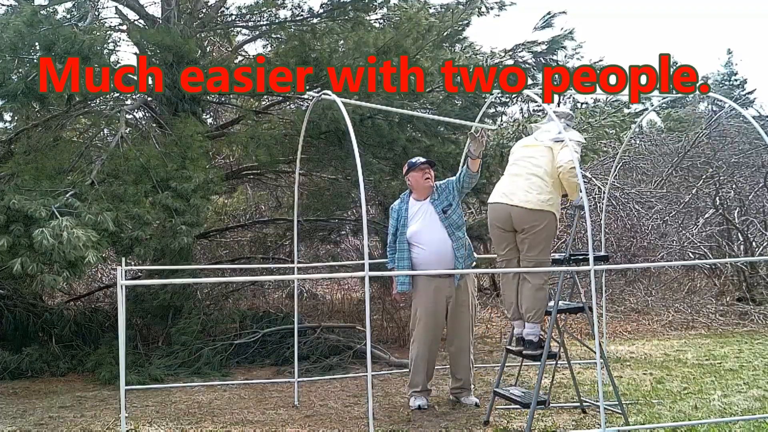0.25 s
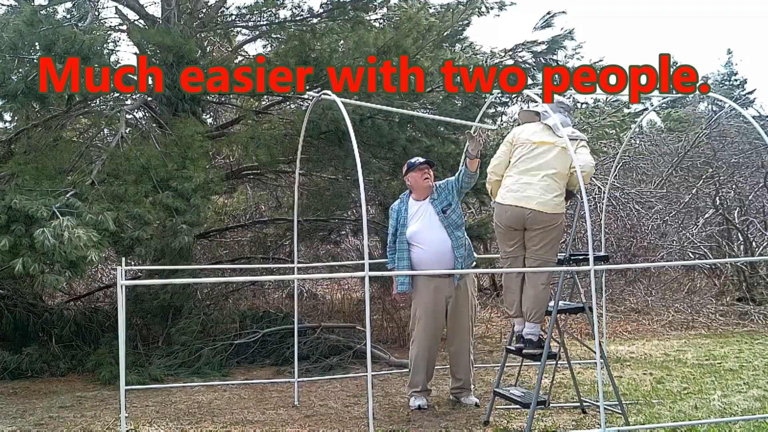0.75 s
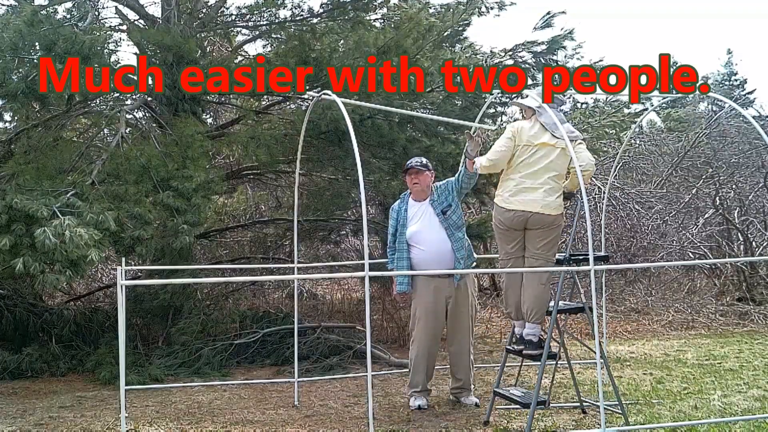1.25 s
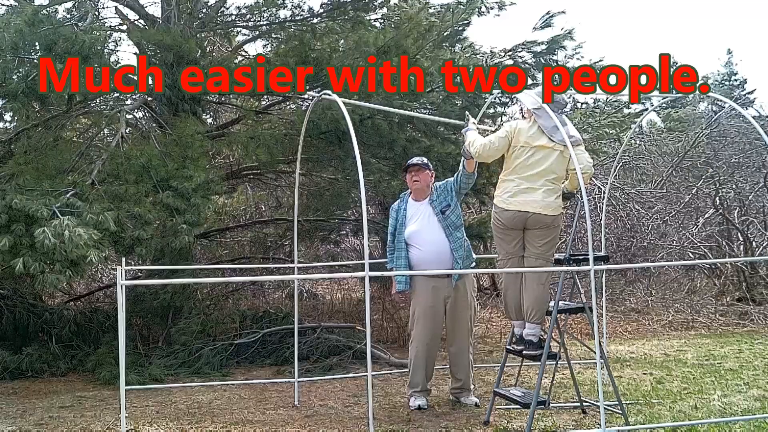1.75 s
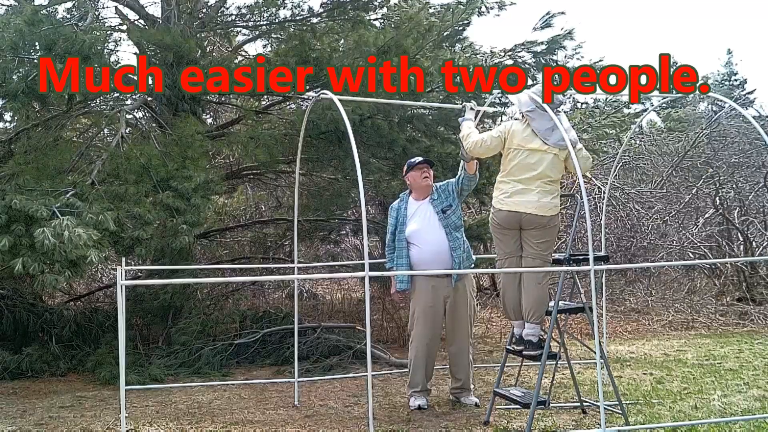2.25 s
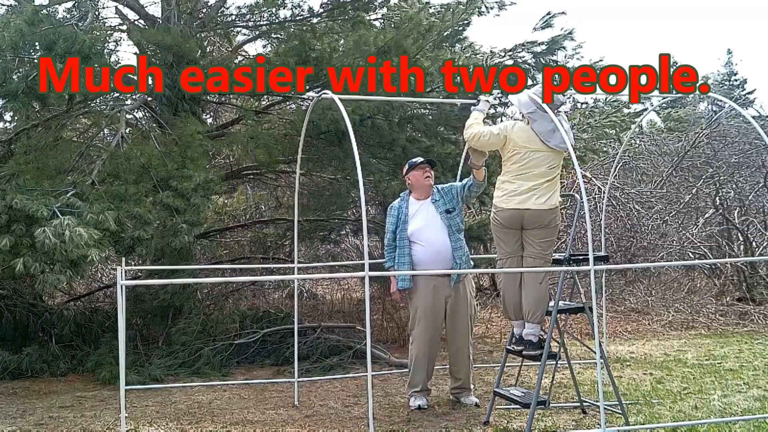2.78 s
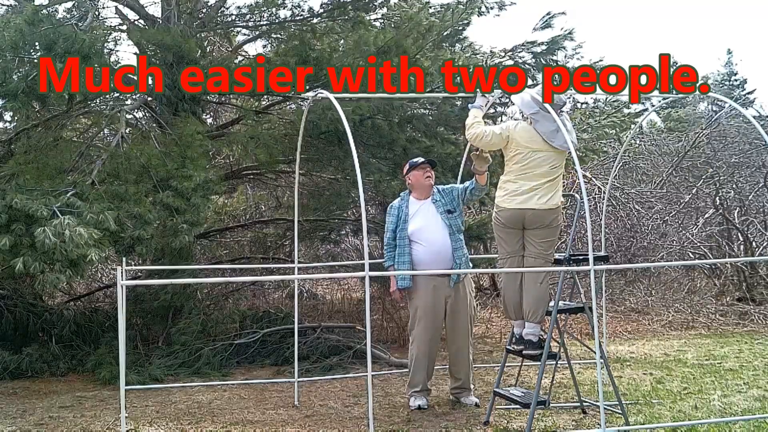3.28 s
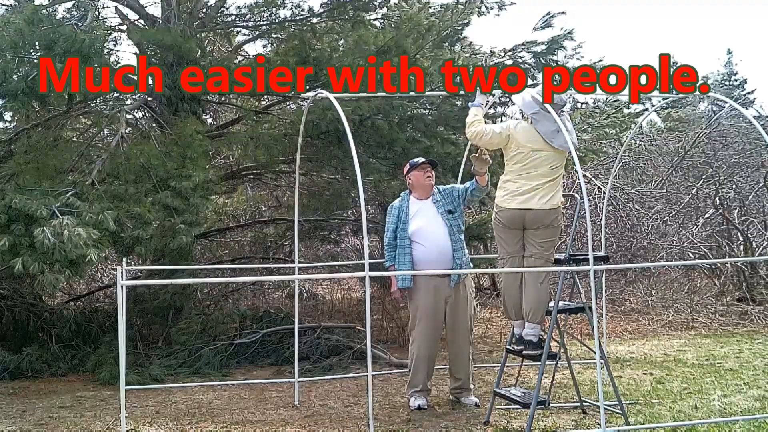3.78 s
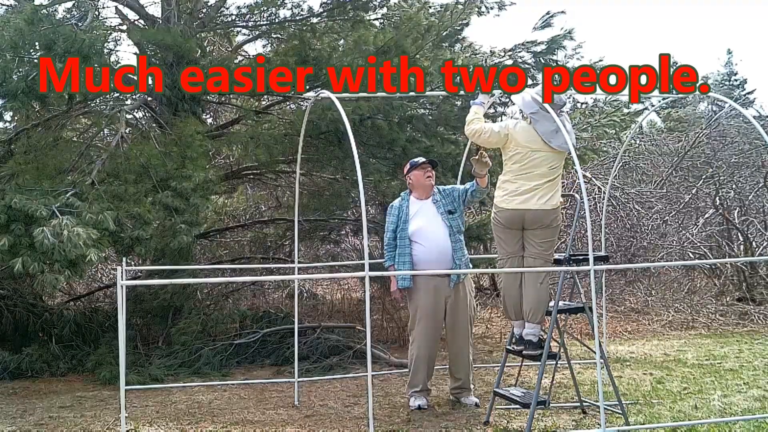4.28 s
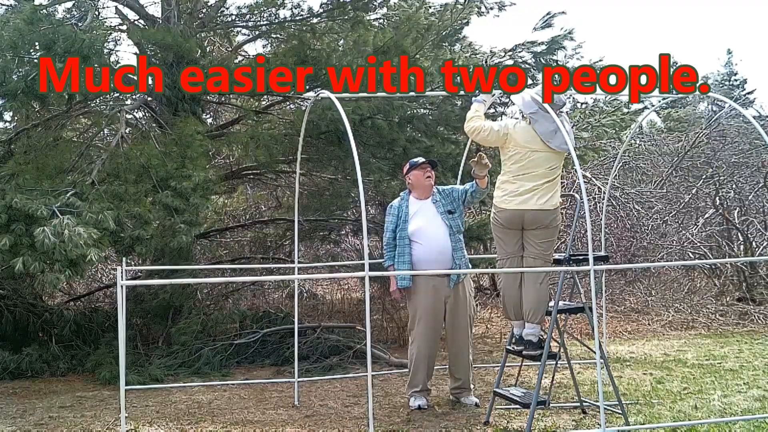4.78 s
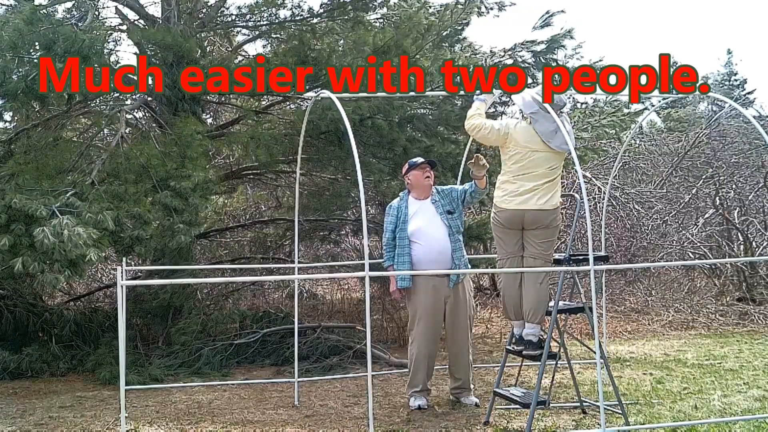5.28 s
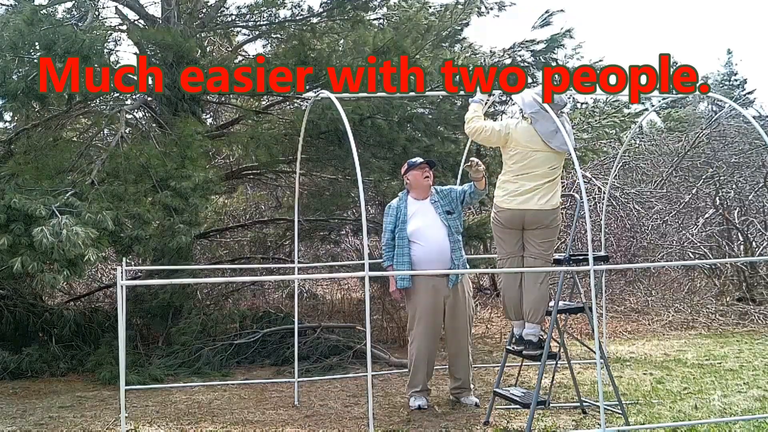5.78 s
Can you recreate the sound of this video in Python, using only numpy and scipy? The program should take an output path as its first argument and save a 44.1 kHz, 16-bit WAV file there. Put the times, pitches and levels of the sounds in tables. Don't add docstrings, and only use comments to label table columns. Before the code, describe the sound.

Throughout the six seconds, a dense chorus of distant small tree frogs holds a high, shimmering wash around three kilohertz, made of very short, slightly rising whistles blurred by echoes from trees and ground. It barely swells or dips, and scattered nearer peeps stand just clear of it. From 0.1 to 0.8 s a far bird gives faint hoarse caws, with a weaker one at 1.1. At 1.0 s a firm, short, hollow knock sounds on a pipe frame; a tiny gritty scuff follows at 2.96, then softer, lower taps at 3.57 and 3.94. About every 0.4 s a close lens motor chatters faintly for a tenth of a second, ending in a minute squeak; one clearer squeak comes at 1.26. Underneath lie soft breeze, faint hiss and electrical buzz, and deep wind thumps on the microphone, notably around 0.5, 4.8 and strongest at 5.57 s.

```python
import sys
import numpy as np
from scipy import signal
from scipy.fft import rfft, irfft
from scipy.io import wavfile
from scipy.ndimage import uniform_filter1d

SR = 44100
rng = np.random.default_rng(int(sys.argv[2]) if len(sys.argv) > 2 else 0)


def bounce(signal):
    frames = np.transpose(np.atleast_2d(signal))
    limited = np.clip(frames, -1, 1)
    pcm = np.round(limited * 32767).astype(np.int16)
    wavfile.write(sys.argv[1], SR, pcm)


def boost_factor(decibels):
    exponent = np.asarray(decibels, float) / 20
    return 10 ** exponent


N = 266364
CUTOFF_HZ = 15740


def rms_one(x):
    return x / np.sqrt(np.mean(x ** 2) + 1e-20)


def in_time(rows):
    s, db = np.transpose(rows)
    return np.interp(np.arange(N) / SR, s, db)


def at_hz(points, hz):
    point_hz, db = np.transpose(points)
    return np.interp(np.log(hz), np.log(point_hz), db)


def drift(rate):
    r = np.exp(-80 * np.pi * rate / SR)
    noise = rng.standard_normal(N // 40 + 2002)
    slow = signal.lfilter([1], [1, -2 * r, r * r], noise)[2000:]
    return np.interp(np.arange(N) / 40, np.arange(len(slow)), rms_one(slow))


def colour(x, spectrum):
    hz = np.maximum(np.arange(N // 2 + 1) * SR / N, 1)
    inside = (hz > spectrum[0][0]) & (hz < spectrum[-1][0])
    return irfft(rfft(x) * boost_factor(at_hz(spectrum, hz)) * inside, N)


def patchy(spectrum, patchy_db, rate):
    x, out = rfft(colour(rng.standard_normal(N), spectrum)), 0
    octave = np.log2(np.maximum(np.arange(len(x)) * SR / N, 1))
    lowest, highest = np.log2(spectrum[0][0]), np.log2(spectrum[-1][0])
    for centre in np.arange(lowest, highest + .5, .5):
        band = np.clip(1 - 2 * abs(octave - centre), 0, 1)
        out = out + boost_factor(patchy_db * drift(rate)) * irfft(x * band, N)
    return rms_one(out)


def evened(x, span_s, share):
    power = uniform_filter1d(x ** 2 + 1e-12, max(int(span_s * SR), 9))
    return rms_one(x / power ** (share / 2))


def bandpass(x, order, low_hz, high_hz):
    return signal.sosfilt(signal.butter(order, [low_hz, high_hz], "band", fs=SR, output="sos"), x)


def resonate(x, hz, width_hz):
    r = np.exp(-np.pi * width_hz / SR)
    poles = [1, -2 * r * np.cos(2 * np.pi * hz / SR), r * r]
    return signal.lfilter((1 - r * r) / 2 * np.array([1, 0, -1]), poles, x)


def peeps(middle_s, hz, gain, length_s, rise):
    size = int(length_s.max() * SR) + 1
    t = (np.arange(size) - size // 2) / SR
    u = np.clip(t / length_s[:, None], -.5, .5)
    turn = hz[:, None] * t * (1 + rise * u / 2) + rng.random((len(hz), 1))
    swell = np.cos(np.pi * u.astype("f4")) ** 2
    notes = gain[:, None] * swell * np.sin(2 * np.pi * turn.astype("f4"))
    at = np.clip((middle_s * SR).astype(int), 0, N)[:, None] + np.arange(size)
    return np.bincount(at.ravel(), notes.ravel(), N + size + 1)[size // 2:size // 2 + N]


def woods(x, t60, wet_db):
    t = np.arange(SR // 3) / SR
    tail = rng.standard_normal(len(t)) * boost_factor(-60 * t / t60) * (t > .01)
    return x + boost_factor(wet_db) * signal.fftconvolve(x, tail / np.sqrt(np.sum(tail ** 2)))[:N]


# (time [s], level [dB])
CHORUS_LEVEL = [
    (0.0, -43),
    (1.02, -42),
    (1.14, -44.5),
    (1.18, -42.5),
    (3.4, -43),
    (3.55, -44.5),
    (3.78, -42.5),
    (4.64, -43.5),
    (6.01, -43.5),
    (6.04, -45),
]
# (frequency [Hz], density [dB per Hz])
VOICES = [(2350, -25), (2520, -25), (2700, -12), (2800, -9.5), (2950, -4.5), (3100, -1.5), (3250, 0),
          (3350, -1.5), (3500, -7), (3650, -13.5), (3900, -15), (4200, -20), (4480, -23.5), (4600, -30),
          (4900, -41)]


def far_frogs(count=640, size=16, channels=8):
    waver_db, waver_rate = 0.5, 2.3
    low_db, high_db = waver_db * drift(waver_rate), waver_db * drift(waver_rate)
    total = count * size
    pitch = np.repeat(np.linspace(2400, 4880, count), size) * (1 + 0.013 * rng.standard_normal(total))
    beat = np.arange(size) + rng.random((count, 1)) + .12 * rng.standard_normal((count, size))
    when = beat.ravel() * (N / SR / (size - 1)) - .3
    distance_db = np.repeat(rng.normal(0, 1.0, count), size) + rng.normal(0, 1.9, total)
    at = np.clip((when * SR).astype(int), 0, N - 1)
    group_db = (pitch < 2870) * low_db[at] + (pitch > 3640) * high_db[at]
    gain, length = boost_factor(distance_db + group_db), rng.uniform(0.011, 0.04, total)
    bank = rng.integers(0, channels, total)
    calls = np.zeros(N)
    for k in range(channels):
        here = bank == k
        dry_calls = peeps(when[here], pitch[here], gain[here], length[here], rise=0.1)
        calls += woods(dry_calls, t60=0.85, wet_db=5)
    return boost_factor(in_time(CHORUS_LEVEL) + 0.13) * evened(colour(calls, VOICES), span_s=0.064, share=0.87)


# (time [s], pitch [Hz])
NEAR_PEEPS = [(0.163, 2691), (0.254, 3359), (0.393, 3283), (0.594, 3165), (0.61, 2702), (0.791, 3219),
              (1.019, 2702), (1.199, 3165), (1.3, 3122), (1.734, 3262), (1.93, 3305), (1.975, 3262),
              (2.096, 2756), (2.347, 2939), (2.644, 3122), (2.775, 3197), (2.913, 3456), (3.017, 3283),
              (3.307, 3413), (3.312, 2928), (3.688, 3090), (3.791, 2885), (3.876, 3133), (4.062, 3003),
              (4.148, 3262), (4.257, 3337), (5.294, 3197), (5.656, 3326), (5.782, 3090), (5.934, 3186)]


def near_frogs():
    s, hz = np.transpose(NEAR_PEEPS)
    db = -39.5 + 0.52 * at_hz(VOICES, hz)
    db = db + 2.5 * (hz < 2720)
    return woods(peeps(s, hz, boost_factor(db), np.full(len(s), .03), rise=0.0065), t60=0.5, wet_db=-18)


# (start [s], length [s], level [dB])
MOTOR_RUNS = [(0.098, 0.11, -62.5), (0.485, 0.098, -63), (0.842, 0.103, -60.5), (1.208, 0.13, -60.5),
              (1.61, 0.092, -62), (2.013, 0.1, -63), (2.35, 0.101, -61), (2.751, 0.091, -63),
              (3.14, 0.11, -62.5), (3.545, 0.087, -63), (3.882, 0.112, -60), (4.285, 0.11, -61),
              (4.714, 0.075, -60.5), (5.05, 0.11, -62.5), (5.45, 0.104, -62), (5.836, 0.105, -61.5)]
# (frequency [Hz], width [Hz], level [dB])
BARREL = [(4750, 140, 0), (5240, 64, 5.5), (5930, 150, -5), (7630, 80, 2), (7340, 2900, -8.5),
          (9200, 250, -4), (9430, 200, -5), (10700, 400, -13)]
# (time [s], peak [dB])
SLIPS = [
    (1.2565, -52),
    (3.1767, -62),
]


def lens_motor():
    brake_lead_s, brake_db, ramp_s = 0.01, -58, 0.0054
    gate, squeak, whirr = np.zeros(N), np.zeros(N), np.zeros(N)
    t = np.arange(N) / SR
    for s, length, db in MOTOR_RUNS:
        gate += boost_factor(db) * np.clip(np.minimum(t - s, s + length - t) / ramp_s + .5, 0, 1)
    teeth = rng.standard_normal(N) * boost_factor(1.2 * drift(70))
    for k, (hz, width, db) in enumerate(BARREL):
        sign = (-1) ** k
        whirr += sign * boost_factor(db + 2.5 * drift(1.8)) * resonate(teeth, hz, width)
    brakes = [(s + length - brake_lead_s, brake_db) for s, length, _ in MOTOR_RUNS]
    s, db = np.transpose(brakes + [tuple(slip) for slip in SLIPS])
    for hz, overtone_db in [(6100, -1.5), (9150, -0.38)]:
        gain = boost_factor(db + overtone_db + 2.0 * rng.standard_normal(len(s)))
        squeak += peeps(s + 0.0095, np.full(len(s), hz), gain, np.full(len(s), .014), rise=.03)
    return boost_factor(0.4) * gate * rms_one(whirr) + squeak


# (time [s], peak [dB], pitch factor of the pipe struck [ratio])
TAPS = [
    (1.0015, -31.5, 1.0),
    (3.565, -39.5, .84),
    (3.941, -42, .84),
]
# (frequency [Hz], level [dB], t60 [s])
PIPE = [(340, -8, .018), (600, -3, .015), (840, 1, .03), (1020, -5, .015), (1340, -3, .012),
        (1620, -5, .01)]
# (frequency [Hz], density [dB per Hz])
SCUFF_COLOUR = [(500, -14), (1000, 4), (1300, -3), (1800, 0), (2400, -4), (3600, -14), (4430, -6),
                (4800, -16), (7000, -17), (11500, -22), (14000, -38)]


def frame():
    out = np.zeros(N)
    for s, db, factor in TAPS:
        clicks, at = np.zeros(SR // 10), round(s * SR)
        clicks[0], clicks[round(.0032 * SR)] = -boost_factor(db - 3), -boost_factor(db - 14)
        clicks = bandpass(clicks, 3, 260, 1600)
        for hz, mode_db, t60 in PIPE:
            r, w = boost_factor(-60 / (t60 * SR)), 2 * np.pi * hz * factor / SR
            poles = [1, -2 * r * np.cos(w), r * r]
            out[at:at + len(clicks)] += signal.lfilter([0, boost_factor(mode_db) * np.sin(w)], poles, clicks)
    grains = (rng.random(N) < 9000.0 / SR) * rng.standard_normal(N)
    t = np.arange(N) / SR - 2.963
    rise_db, fall_db = 2200 * t, 600 * (.012 - t)
    stroke = boost_factor(-45.5 + np.minimum(0, np.minimum(rise_db, fall_db)))
    grit = rms_one(colour(grains, SCUFF_COLOUR))
    edge = boost_factor(2) * (t < .010) * bandpass(grit, 2, 4000, 10500)
    return out + stroke * (grit + edge)


# (time [s], pitch [Hz], peak [dB], length [s])
CAWS = [
    (0.092, 1590, -49.5, 0.18),
    (.12, 1340, -61, .06),
    (0.25, 984, -51, 0.08),
    (0.397, 1395, -52, 0.21),
    (0.389, 1620, -55, 0.13),
    (0.51, 1620, -52, 0.055),
    (0.656, 1628, -51, 0.15),
    (1.11, 1530, -56, 0.097),
    (3.83, 1670, -61, .06),
]


def far_bird():
    s, hz, db, length = np.transpose(CAWS)
    rasp = .35 + drift(90)
    return woods(peeps(s, hz, boost_factor(db - 7), length, rise=.02) * rasp, t60=0.36, wet_db=-1)


# (time [s], level [dB])
GUST = [(0.0, -44), (0.32, -50), (0.5, -39), (0.57, -50.5), (1.21, -42), (1.24, -46), (2.03, -50),
        (2.07, -43), (3.92, -49.5), (4.76, -39), (4.88, -46), (4.93, -38.5), (5.01, -51), (5.52, -46),
        (5.57, -30), (5.63, -53), (5.87, -43), (6.04, -46.5)]
# (frequency [Hz], density [dB per Hz])
THUMP = [(4, -11), (12, -14), (19, -12), (27, 13), (36, 9), (50, -19), (70, -62)]
# (frequency [Hz], density [dB per Hz])
WIND = [(30, -28), (45, 0), (59, 4), (75, -8), (90, 1), (130, -11), (200, -16), (300, -39)]


def port_wind():
    gust_db = in_time(GUST)
    flutter_db = -48.5 + 0.058 * (gust_db - gust_db.mean())
    flutter = boost_factor(flutter_db) * evened(patchy(WIND, patchy_db=1.5, rate=2.8), span_s=0.04, share=0.28)
    thump = evened(patchy(THUMP, patchy_db=4.0, rate=4.1), span_s=0.029, share=0.7)
    return flutter + boost_factor(gust_db - 0.3) * thump


# (frequency [Hz], density [dB per Hz])
BREEZE = [(59, -13), (100, -3.5), (306, -11), (565, -13.5), (722, -12.5), (783, -12), (862, -12),
          (1150, -19.5), (1640, -17), (2030, -22.5), (2400, -22), (2600, -21), (3380, -13), (5720, -120)]


def country_breeze():
    t = np.arange(N) / SR
    breeze = patchy(BREEZE, patchy_db=0.64, rate=14.0)
    upper = signal.sosfilt(signal.butter(2, 1150, "high", fs=SR, output="sos"), breeze)
    croak = boost_factor(0.06 * (t.mean() - t) + 1.15 * drift(12))
    return boost_factor(-49.5 - 0.16 * t) * (breeze + (croak - 1) * upper)


# (frequency [Hz], density [dB per Hz])
HISS = [(1800, -10), (4400, 5), (4700, 6), (5000, 2.3), (5300, 0.5), (7400, 1.5), (8600, 0), (12000, -1.5),
        (15000, -1), (17000, -6)]
# (centre [Hz], width [Hz], rms of a line [dB])
BUZZ = [(120, 60, -70), (720, 150, -70), (1450, 300, -83), (4500, 200, -85), (5350, 300, -92),
        (6200, 300, -84), (7500, 400, -93), (9000, 500, -88), (10800, 600, -88), (11650, 250, -91),
        (12220, 420, -85)]


def circuits():
    hz = 120 * np.arange(1, 126)
    lines = sum(boost_factor(db - 10 * ((hz - centre) / width) ** 2) for centre, width, db in BUZZ)
    t = np.arange(SR // 60) / SR
    waves = np.sin(2 * np.pi * (hz[:, None] * t + rng.random((len(hz), 1))))
    period = np.sqrt(2) * lines @ waves
    return boost_factor(-58.5) * patchy(HISS, patchy_db=0.72, rate=28) + np.resize(period, N)


def scene():
    animals = far_frogs() + near_frogs() + far_bird()
    handling = lens_motor() + frame()
    background = port_wind() + country_breeze() + circuits()
    return (animals + handling + background)[None]


def starve(x):
    spectrum, hz = rfft(x), np.arange(N // 2 + 1) * SR / N
    step_hz = 340
    lows = np.arange(11300, CUTOFF_HZ, step_hz)
    rarities = np.linspace(1.9, 1.1, len(lows))
    bands = [(4540, 4840, .35), *zip(lows, lows + step_hz, rarities)]
    for low, high, rarity in bands:
        gone = np.clip(4 * (drift(30) - rarity), 0, 1 - .1)
        x = x - gone * irfft(spectrum * (hz > low) * (hz < high), N)
    return x


def top_cut(x):
    return signal.sosfilt(signal.butter(12, 16750, fs=SR, output="sos"), x)


def record(dry):
    below_cutoff = np.arange(N // 2 + 1) * SR / N < CUTOFF_HZ
    cut = irfft(rfft(starve(dry)) * below_cutoff, N)
    fade_in = np.minimum(np.arange(N) / (.012 * SR), 1)
    mix = (cut - .0266) * fade_in
    return top_cut(mix)


dry = scene()
out = record(dry)
bounce(out)
```